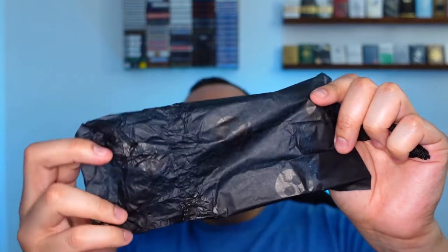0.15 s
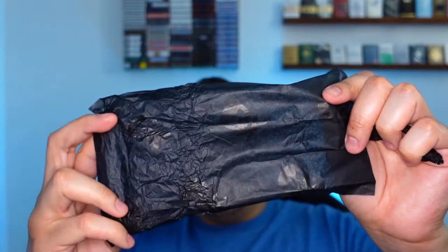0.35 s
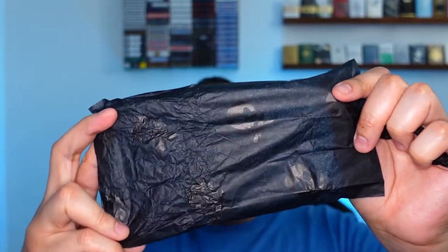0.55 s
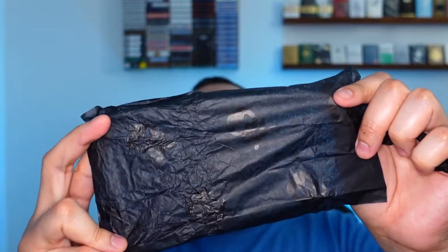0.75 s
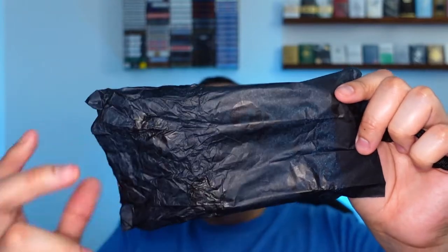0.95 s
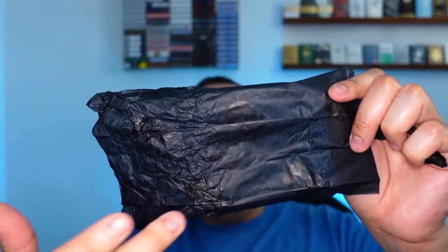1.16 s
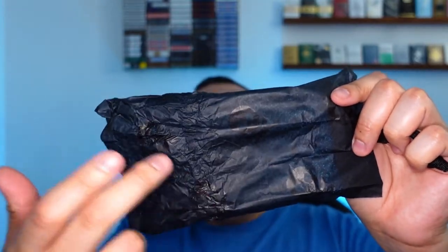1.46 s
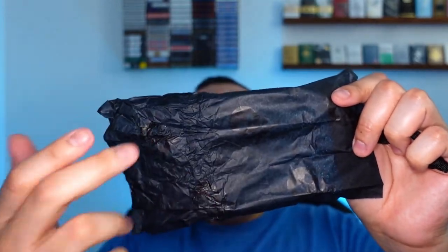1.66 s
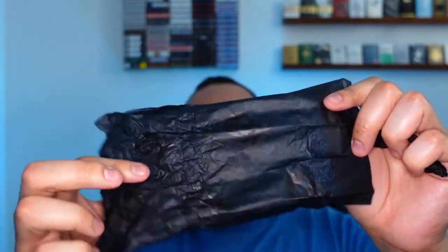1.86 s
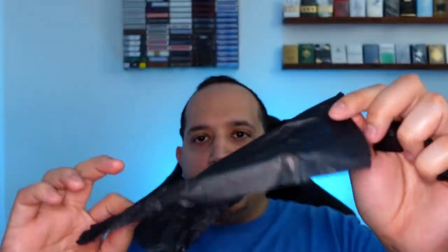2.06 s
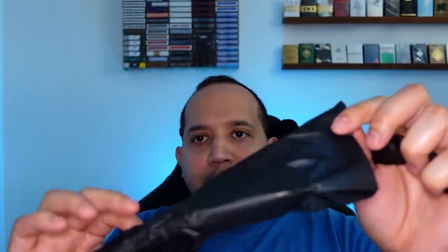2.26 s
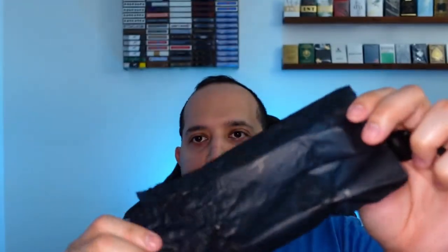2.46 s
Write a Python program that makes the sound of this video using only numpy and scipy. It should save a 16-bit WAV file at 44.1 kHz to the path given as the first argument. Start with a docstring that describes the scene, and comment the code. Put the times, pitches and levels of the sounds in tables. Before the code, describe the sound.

Thin tissue paper crinkles sharply in two hands close to the microphone, dense at first, then nearly silent with faint fingertip taps, then a flap swings with low air movement and softer crackling in a small quiet room.

```python
"""Thin tissue paper is unfolded close to the microphone in a small room: creases buckle with dry snaps over
a dense crackle, each a tick and decaying noise bursts in a random facet colour, while the folds rub as noise.
In a pause a fingertip taps the sheet, a decaying low bump; a flap then swings open and fans air at the
microphone as very low noise. Skin slides hiss thinly, the bellying sheet gives hollow resonant puffs,
and decaying noise tails make the room over a quiet floor."""
import sys
import numpy as np
from scipy import signal
from scipy.fft import rfft, irfft, next_fast_len
from scipy.io import wavfile
from scipy.ndimage import uniform_filter1d, map_coordinates

SR = 44100
rng = np.random.default_rng(int(sys.argv[2]) if len(sys.argv) > 2 else 0)


def dump(signal):
    """Clip the signal to [-1, 1] and save it as 16-bit WAV at the path in sys.argv[1]."""
    limited = np.clip(np.atleast_2d(signal).T, -1, 1)
    pcm = np.round(limited * 32767).astype(np.int16)
    wavfile.write(sys.argv[1], SR, pcm)


N = 114660


def amp(db):
    """Decibels to gain."""
    return 10 ** (np.asarray(db) / 20)


def unit(x):
    """Scale to rms 1."""
    return x / np.sqrt(np.mean(x ** 2) + 1e-20)


def along(points, hz):
    """Read (f/Hz, value) points on a log frequency axis."""
    f, value = np.transpose(points)
    return np.interp(np.log(hz + 1), np.log(f + 1), value)


def curve(rows):
    """Read (t/s, value) points as one value per sample."""
    return np.interp(np.arange(N) / SR, *np.transpose(rows))


def filtered(x, response):
    """Multiply the spectrum of x by a response of frequency."""
    size = next_fast_len(N + SR // 2)
    hz = np.fft.rfftfreq(size, 1 / SR)
    return irfft(rfft(x, size) * response(hz), size)[:N]


def noise(spectrum):
    """Coloured noise of rms 1."""
    return unit(filtered(rng.standard_normal(N), lambda hz: amp(along(spectrum, hz))))


def bell(s, length_s):
    """A swell and fade centred on s; length_s is its standard deviation."""
    t = np.arange(N) / SR
    return np.exp(-.5 * ((t - s) / length_s) ** 2)


RUN_DB, SHIVER_DB, SHIVER_T60_S = 3, -2.5, 0.059  # levels against the first tick
TICK_EDGE = .6  # recoil of the tick, which makes it bright
REBOUND_S, REBOUND_DB = .0018, -7.5  # latest start of the second tick, and its level
FACET_WIDTH_HZ, FACET_WIDENS_HZ = 303, 2556  # spacing of the facet's resonances, wider in the treble
DULL_CORNER_HZ = 4300  # dullness lifts the band below this


def facet_colour(spectrum, dull_db, ripple_db, hz):
    """The facet's level/dB over frequency: the paper's colour, its dullness and random resonances."""
    place = FACET_WIDENS_HZ / FACET_WIDTH_HZ * np.log1p(hz / FACET_WIDENS_HZ) + rng.random()
    ripple = ripple_db * map_coordinates(rng.standard_normal(size=64), [place], mode="mirror")
    shelf = 1 / (1 + (hz / DULL_CORNER_HZ) ** 4)
    return along(spectrum, hz) + dull_db * shelf + ripple


def buckle(spectrum, dull_db, length_s, ripple_db, size=2048):
    """One crease flips: a sharp tick, a burst as it runs on, a rebound and a shiver of the sheet; energy 1."""
    t, hz = np.arange(size) / SR, np.fft.rfftfreq(size, 1 / SR)
    x = np.zeros(size)
    run_fall, shiver_fall = (t / length_s) ** 2, t / SHIVER_T60_S
    for fall, db in ((run_fall, RUN_DB), (shiver_fall, SHIVER_DB)):
        burst = rng.standard_normal(size) * amp(-60 * fall)
        x += amp(db) * burst / np.linalg.norm(burst)

    tick = rng.choice([-1, 1]) * np.array([1, -TICK_EDGE])
    x[:2] += tick
    rebound_at = int(rng.random() * REBOUND_S * SR)
    x[rebound_at:][:2] += amp(REBOUND_DB) * tick

    # minimum phase keeps the coloured attack sharp
    cepstrum = irfft(np.log(amp(facet_colour(spectrum, dull_db, ripple_db, hz))))
    cepstrum[1:size // 2] *= 2
    cepstrum[size // 2 + 1:] = 0
    x = irfft(rfft(x) * np.exp(rfft(cepstrum)))
    return x / np.linalg.norm(x)


# creases that buckle: (t/s, level/dB before the trim, dullness/dB of bass over treble, length/s)
CREASES = [(0.061, -41.5, -7, 0.012), (0.1217, -35.5, 1, 0.0042), (0.142, -38, 2, 0.0093),
           (0.1637, -29, -7, 0.021), (0.17, -29, -4, 0.013), (0.1753, -29.5, 2, 0.012),
           (0.1931, -25.5, -1.5, 0.006), (0.2023, -36.5, -6, 0.005), (0.2193, -31.5, 6.5, 0.0069),
           (0.2329, -36, 0, 0.004), (0.2651, -34.5, 4.5, 0.0044), (0.295, -39, 7, 0.004),
           (0.311, -29.5, 3, 0.021), (0.317, -26, -11, 0.0052), (0.3273, -28, -6, 0.026),
           (0.3564, -29, -7, 0.017), (0.3742, -33.5, -2, 0.0064), (0.382, -29, 2.5, 0.0093),
           (0.3874, -34.5, 5, 0.0068), (0.4344, -31.5, -12, 0.016), (0.4375, -40, 10, 0.0067),
           (0.447, -36, 7, 0.0048), (0.4522, -39, 0, 0.0033), (0.5119, -35, 1, 0.007),
           (0.5217, -32, -4, 0.016), (0.5443, -28.5, -4, 0.01), (0.574, -35.5, -6, 0.0045),
           (0.6064, -33, 3.5, 0.0022), (0.6116, -39, 6, 0.004), (0.636, -43, 2, 0.0033),
           (0.6572, -39, 0.5, 0.004), (0.6723, -40.5, 11, 0.0039), (0.6784, -46, 25, 0.013),
           (0.704, -52, -14, 0.0096), (0.72, -35.5, -2, 0.017), (0.7292, -35.5, 10, 0.0067),
           (0.7457, -39.5, 7, 0.0035), (0.764, -40, 0, 0.0065), (0.773, -53, 11, 0.0035),
           (0.8087, -48, -1, 0.0032), (0.8594, -40, -2, 0.014), (0.87, -41, 9, 0.0063),
           (0.886, -34.5, -3, 0.0084), (0.9196, -37.5, 4, 0.0026), (0.9617, -35.5, -5.5, 0.0029),
           (0.9645, -32.5, 3.5, 0.0051), (1.048, -49.5, -11.5, 0.0033), (1.085, -66.5, 10.5, 0.013),
           (1.135, -70.5, -8, 0.004), (1.1774, -55.5, -32, 0.0044), (1.3512, -51, 4, 0.013),
           (1.374, -46, -14, 0.0056), (1.39, -49.5, -3, 0.0019), (1.4407, -55.5, 20, 0.0017),
           (1.4572, -47.5, 5.5, 0.0077), (1.6241, -48.5, 4.5, 0.011), (1.71, -71, -2.5, 0.005),
           (1.823, -64.5, 20, 0.005), (1.846, -40, -11, 0.0072), (1.879, -47.5, 10, 0.0067),
           (1.9015, -37, 9.5, 0.011), (1.9271, -33.5, 6.5, 0.016), (1.9718, -37.5, 8, 0.0095),
           (1.9805, -43, -4, 0.0033), (2.037, -37.5, 9, 0.017), (2.057, -35.5, 7, 0.018),
           (2.1007, -40, -3, 0.012), (2.1072, -28.5, -4, 0.0095), (2.1113, -36.5, 15, 0.0023),
           (2.167, -44, 14.5, 0.006), (2.186, -40, 9, 0.0044), (2.3127, -60.5, 21, 0.0039),
           (2.3191, -47.5, 5.5, 0.0037), (2.348, -55, 7, 0.0057), (2.3636, -37, 4.5, 0.015),
           (2.3955, -40, -8, 0.008), (2.416, -36.5, 5, 0.017), (2.4699, -30, 4, 0.0045),
           (2.5485, -47.5, 13, 0.0089), (2.5714, -47.5, 7.5, 0.007)]
# colour of a large crease: (f/Hz, relative level/dB)
CREASE_COLOUR = [(60, -33.5), (300, -10.5), (800, -8), (1100, -7), (2000, -6.5), (5000, 0), (6800, -1.5),
                 (9500, 2.5), (12000, -3.5), (16000, -4)]
SNAP_TRIM_DB, SNAP_FACET_DB = 1.5, 2  # a large crease spans several facets


def snaps():
    """The large creases give way one by one, each with its own colour."""
    out = np.zeros(N + SR)
    span = .003 * SR  # samples: a level is the rms the snap's energy would have over 3 ms
    for s, db, dull_db, length_s in CREASES:
        x = buckle(CREASE_COLOUR, dull_db, length_s, SNAP_FACET_DB)
        out[round(s * SR):][:len(x)] += amp(db + SNAP_TRIM_DB) * np.sqrt(span) * x
    return out[:N]


# how hard the hands work the paper, for crackle and rub: (t/s, level/dB before each one's trim)
HAND_WORK = [(0, -47), (.045, -52.5), (.1, -44), (.15, -42.5), (.18, -34), (.22, -41), (.275, -43.5),
             (.325, -34), (.38, -44), (.415, -45.5), (.45, -38.5), (.495, -41), (.545, -36), (.61, -42.5),
             (.69, -52.5), (.74, -58), (.81, -60), (.845, -51), (.885, -38.5), (.925, -41), (.945, -71),
             (1.03, -81), (1.13, -99), (1.335, -91.5), (1.355, -64.5), (1.395, -55.5), (1.42, -78.5),
             (1.55, -96), (1.81, -88.5), (1.838, -69.5), (1.848, -40.5), (1.885, -55), (1.925, -43),
             (2.04, -42), (2.08, -53.5), (2.115, -46.5), (2.18, -59), (2.23, -85), (2.31, -79),
             (2.352, -53), (2.38, -47), (2.43, -41), (2.49, -42), (2.55, -53.5), (2.6, -61)]
# colour of the crackling and rubbing paper: (f/Hz, relative level/dB)
PAPER_COLOUR = [(40, -29), (120, -19.5), (220, -11.5), (350, -4), (560, -10), (800, -2), (1100, -5.5),
                (2000, -3), (3200, -4.5), (5200, -1), (6700, -3.5), (8200, -1), (10000, -1), (11500, -2.5),
                (14000, -7.5), (16000, -11)]
CRACKLE_PER_S, CRACKLE_TRIM_DB = 600, -2
SIZE_SPREAD_DB, SIZE_LIMIT = 6, 1.6  # largest wrinkle, in spreads above the usual size
DULL_SPREAD_DB, WRINKLE_FACET_DB, WRINKLE_S = 5.5, 3.5, 0.0057


def crackle(count=160):
    """Countless small wrinkles buckle at a steady average rate, louder as the hands work harder."""
    at = np.flatnonzero(rng.random(N) < CRACKLE_PER_S / SR)
    spread = np.minimum(rng.standard_normal(N), SIZE_LIMIT)
    sizes = unit(amp(SIZE_SPREAD_DB * spread)) * rng.choice([-1, 1], N)
    sizes *= amp(curve(HAND_WORK) + CRACKLE_TRIM_DB) * np.sqrt(SR / CRACKLE_PER_S)
    kind = rng.integers(count, size=N)
    wrinkles = []
    for _ in range(count):
        dull_db = DULL_SPREAD_DB * rng.standard_normal()
        wrinkles.append(buckle(PAPER_COLOUR, dull_db, WRINKLE_S, WRINKLE_FACET_DB))
    out = np.zeros(N + SR)
    for i in at:
        x = wrinkles[kind[i]]
        out[i:i + len(x)] += sizes[i] * x
    return out[:N]


def rub():
    """Fold slides over fold with a soft hiss that follows the hands."""
    return amp(curve(HAND_WORK) - 7) * noise(PAPER_COLOUR)  # trim in dB


# gain of the bass in the crinkling: (t/s, level/dB)
CRINKLE_BASS = [(0, 3), (.3, 0), (.6, 4), (.85, 2.5), (1.0, 3.5), (1.4, -12), (1.85, 0.5), (2.12, -1),
                (2.33, -30), (2.42, -2.5), (2.6, -6)]
BASS_CORNER_HZ = 674


def crinkle():
    """Crackle, rub and snaps together, their bass rising and falling over time."""
    x = crackle() + rub() + snaps()
    bass = filtered(x, lambda hz: 1 / (1 + (hz / BASS_CORNER_HZ) ** 4))
    return x + (amp(curve(CRINKLE_BASS)) - 1) * bass


# fingers bump or tug the whole sheet: (t/s, level/dB, t60/s)
FINGER_THUDS = [(0.0, -62, 0.17), (0.106, -52.5, 0.28), (0.164, -54.5, 0.33), (0.291, -55, 0.28),
                (0.385, -39.5, 0.068), (0.824, -58.5, .15), (.875, -58, 0.13), (0.964, -56, 0.054),
                (1.349, -57, 0.1), (1.622, -51, 0.08), (1.844, -47, 0.28), (2.029, -61, 0.17),
                (2.574, -59, 0.13)]
# colour of the bump: (f/Hz, relative level/dB)
BUMP_COLOUR = [(20, -12), (50, 3.5), (80, -2), (130, -8), (200, -8.5), (450, -12), (620, -24.5), (820, -12),
               (1100, -17.5), (1600, -14), (3000, -33), (8000, -59.5)]


def thuds(attack_s=0.00059):
    """A finger meets the sheet with a soft, low bump: decaying coloured noise."""
    t = np.arange(N) / SR
    envelope = np.zeros(N)
    for s, db, t60 in FINGER_THUDS:
        age = np.maximum(t - s, 0)
        envelope += amp(db - 60 * age / t60) * (1 - np.exp(-age / attack_s))
    return envelope * noise(BUMP_COLOUR)


# the sheet bellies with a soft, hollow flap: (t/s, level/dB before the trim, length/s, pitch f/Hz)
SHEET_FLAPS = [(0.22, -58, .03, 338), (0.382, -50, 0.0083, 191), (0.453, -58, 0.023, 372),
               (0.528, -51, 0.011, 236), (0.531, -47.5, 0.015, 334), (0.752, -61.5, 0.014, 326),
               (0.89, -62, .02, 349), (2.038, -50.5, 0.0084, 370), (2.445, -56, 0.014, 380),
               (2.465, -58, 0.028, 313)]
FLAP_Q, FLAP_TRIM_DB = 3.9, -2  # Q: sharpness of the hollow resonance


def flaps():
    """The whole sheet bellies in and out, each time as noise around one low pitch."""
    out = np.zeros(N)
    for s, db, length_s, pitch_hz in SHEET_FLAPS:
        def resonance(hz):
            """Response that peaks at the pitch."""
            detune = hz / pitch_hz - pitch_hz / (hz + 1)
            return 1 / (1 + (FLAP_Q * detune) ** 2)

        hollow = unit(filtered(rng.standard_normal(N), resonance))
        out += amp(db + FLAP_TRIM_DB) * bell(s, length_s) * hollow
    return out


# a fingertip slides over the paper: (t/s, level/dB, length/s)
FINGER_SLIDES = [(.11, -54, 0.053), (0.343, -45, 0.036), (0.466, -53, .04), (2.201, -60, 0.024),
                 (2.429, -37.5, 0.0067)]
# thin hiss of skin on paper: (f/Hz, relative level/dB)
SKIN_COLOUR = [(2000, -44), (6500, -16), (8300, -10), (9900, 4), (11200, -9), (16000, -18.5)]


def slides():
    """Skin brushes along the sheet with short swells of thin hiss."""
    envelope = sum(amp(db) * bell(s, length_s) for s, db, length_s in FINGER_SLIDES)
    return envelope * noise(SKIN_COLOUR)


# air moved by the sheet: (t/s, level/dB before the trim)
AIR_PUSH = [(0.0, -45.5), (0.1, -70), (0.15, -46), (0.73, -72), (0.85, -47.5), (1.21, -50), (1.27, -62.5),
            (1.35, -45), (1.55, -71), (1.64, -47), (1.7, -83.5), (1.85, -32.5), (1.94, -32.5), (1.99, -40),
            (2.06, -33), (2.35, -48.5), (2.4, -41), (2.6, -48)]
# colour of the moving air at the microphone: (f/Hz, relative level/dB)
AIR_COLOUR = [(6, -21), (14, -2), (23, 1), (30, -6.5), (39, -21.5), (55, -32.5), (75, -35), (110, -48.5),
              (200, -67.5), (500, -100)]


def draught():
    """The moving sheet pushes slow waves of air at the microphone."""
    air = noise(AIR_COLOUR)
    # even out the noise's own swells, so that the level follows the table
    local_rms = np.sqrt(np.abs(uniform_filter1d(air ** 2, size=4000)) + 1e-6)
    return amp(curve(AIR_PUSH) - 2.5) * air / local_rms  # trim in dB


# decay time of the small furnished room: (f/Hz, t60/s)
ROOM_DECAY = [(150, 0.37), (800, 0.19), (3000, 0.23), (9000, 0.21), (16000, .19)]
ROOM_DB, WALL_DELAY_S = -12, .007


def room(x, count=8):
    """A small furnished room answers with decaying noise, crossfading from one tail to the next."""
    out, place = np.zeros(N), np.linspace(0, count - 1, N)
    for k in range(count):
        hz, t, z = signal.stft(rng.standard_normal(SR // 2), SR, nperseg=256)
        decay = amp(-60 * t / along(ROOM_DECAY, hz)[:, None])
        tail = signal.istft(z * decay, SR, nperseg=256)[1]
        tail = np.pad(tail / np.linalg.norm(tail), (round(WALL_DELAY_S * SR), 0))
        share = np.sqrt(np.maximum(1 - np.abs(place - k), 0))
        out += signal.fftconvolve(x * share, tail)[:N]
    return amp(ROOM_DB) * out


# colour of the quiet background: (f/Hz, relative level/dB)
FLOOR_COLOUR = [(20, 2), (60, -11), (110, -5.5), (170, -19.5), (350, -26), (1000, -34.5), (3000, -45),
                (16000, -46)]


def floor():
    """Steady, mostly low noise lies under everything."""
    return amp(-72.5) * noise(FLOOR_COLOUR)


def scene():
    """Paper close by, its room, moved air and a quiet floor."""
    paper = crinkle() + thuds() + flaps() + slides()
    return (paper + draught() + room(paper) + floor())[None]


TOP_HZ = 15750


def record(dry):
    """The recorder cuts steeply above its band limit."""
    return filtered(dry[0], lambda hz: 1 / np.sqrt(1 + (hz / TOP_HZ) ** 200))[None]


dry = scene()
out = record(dry)
dump(out)
```